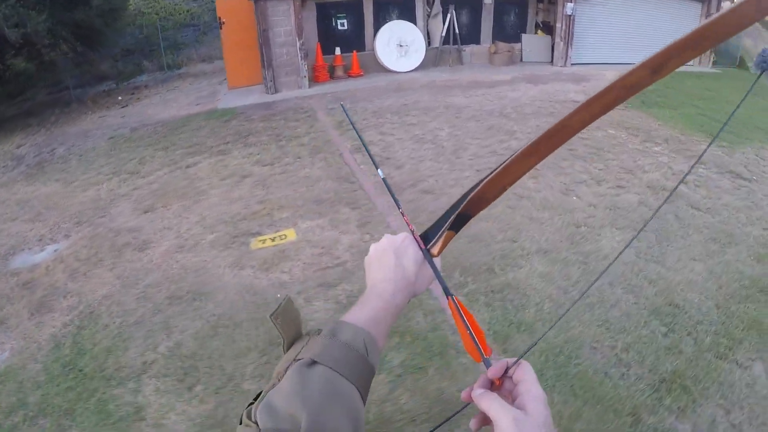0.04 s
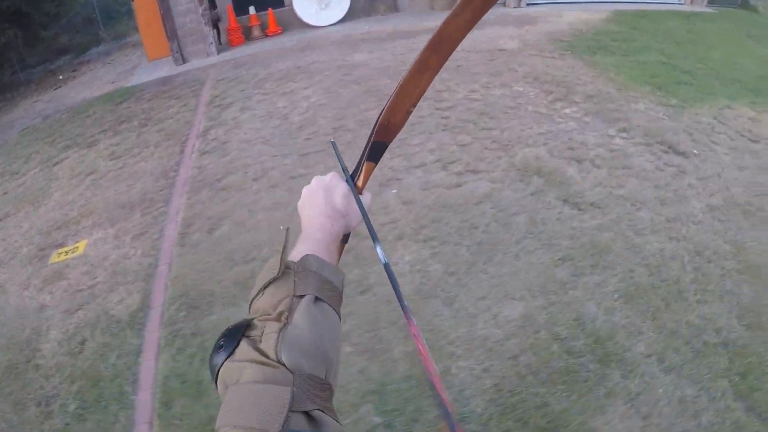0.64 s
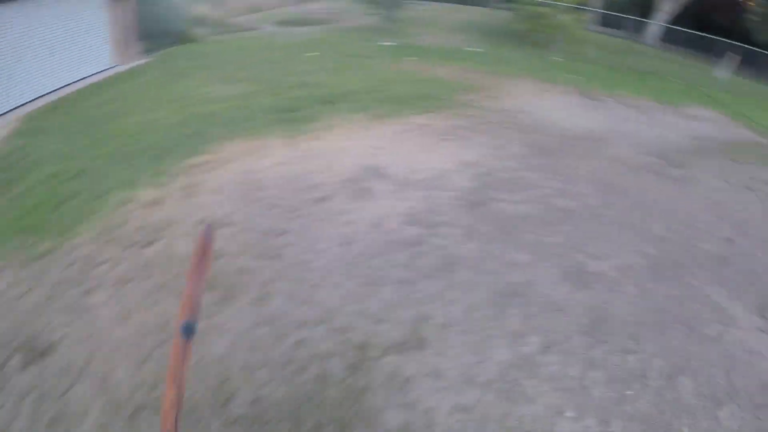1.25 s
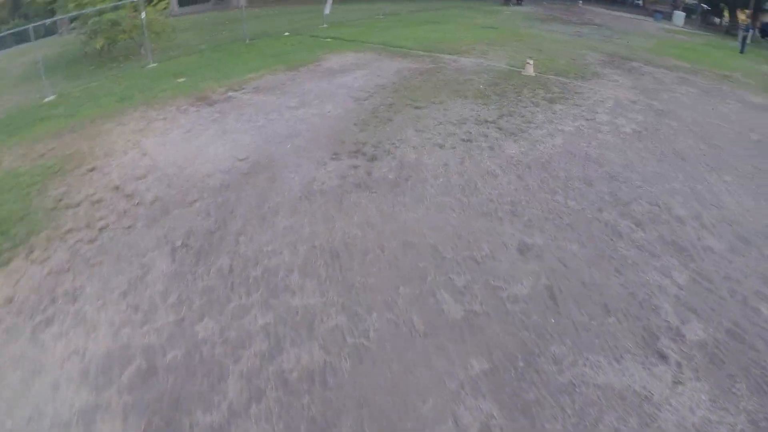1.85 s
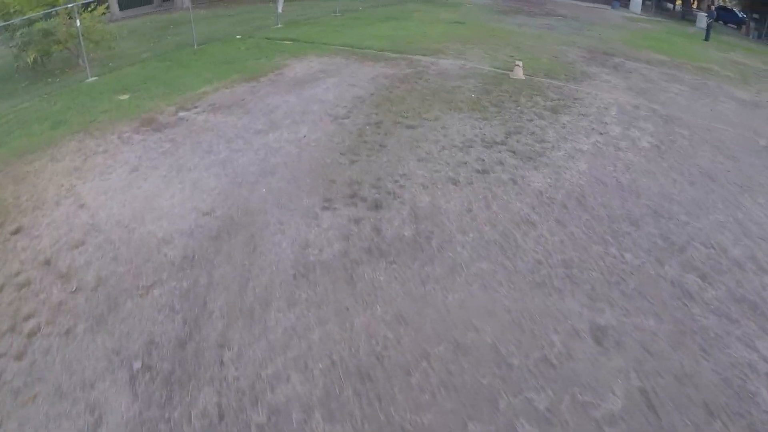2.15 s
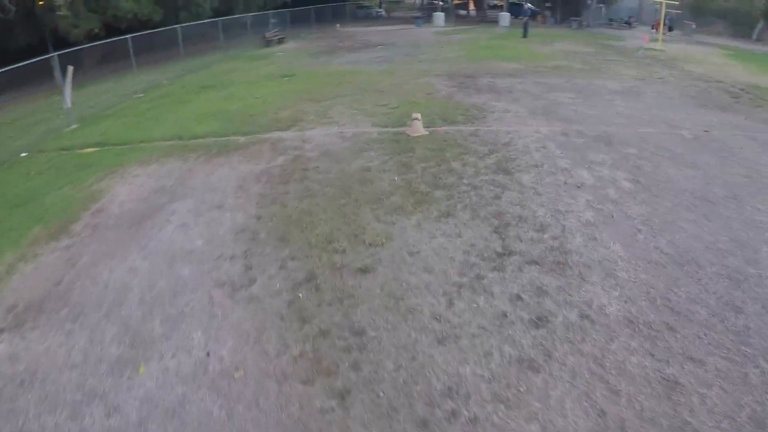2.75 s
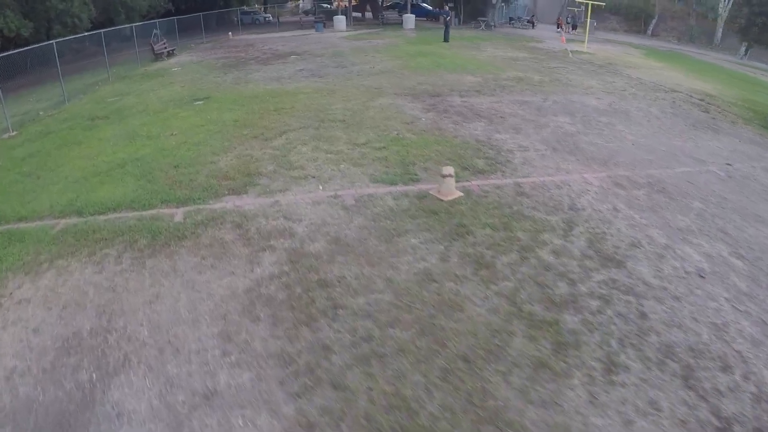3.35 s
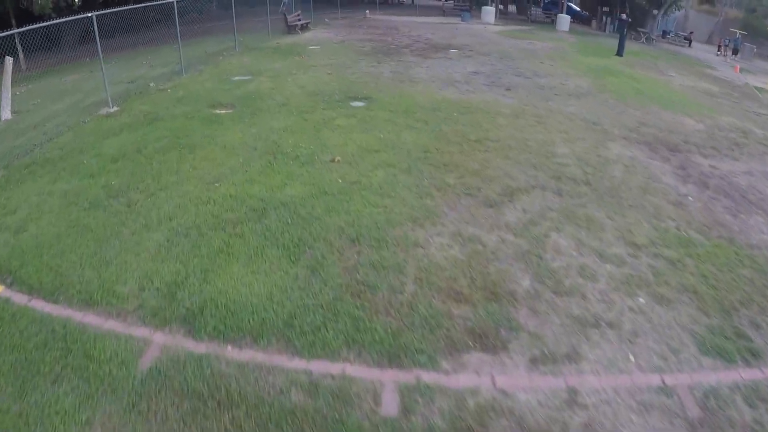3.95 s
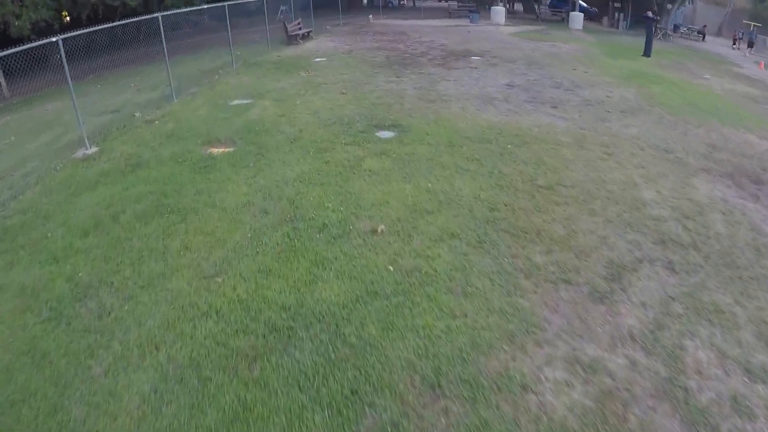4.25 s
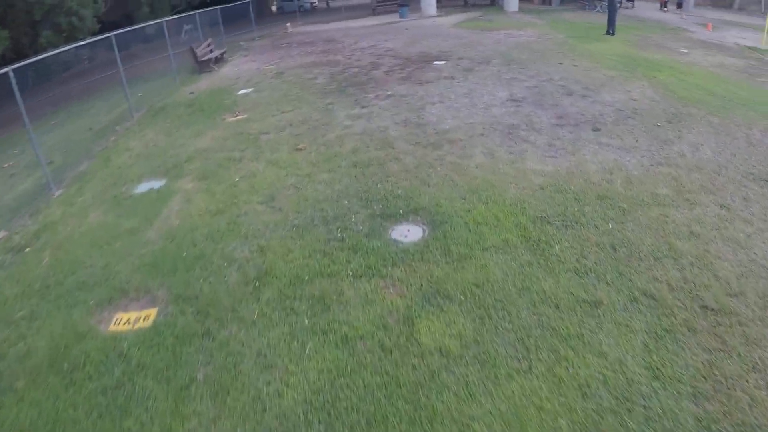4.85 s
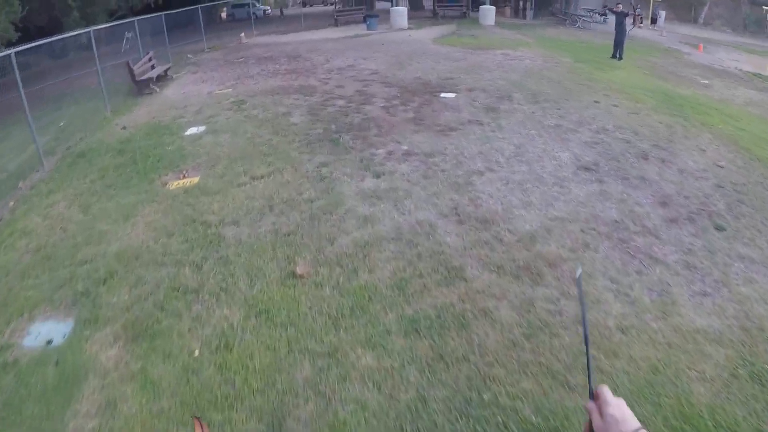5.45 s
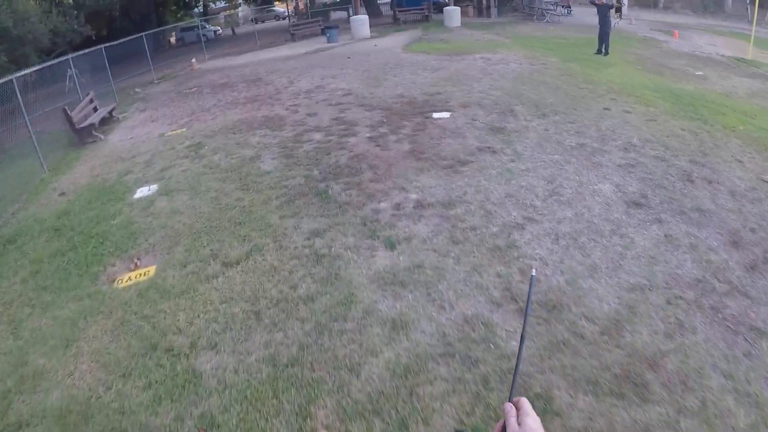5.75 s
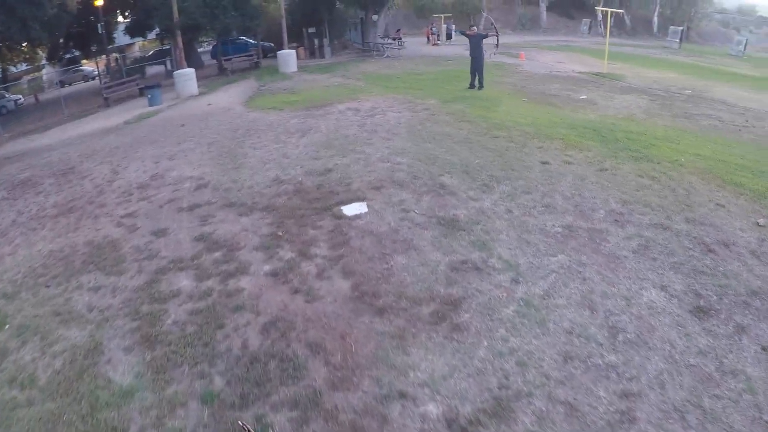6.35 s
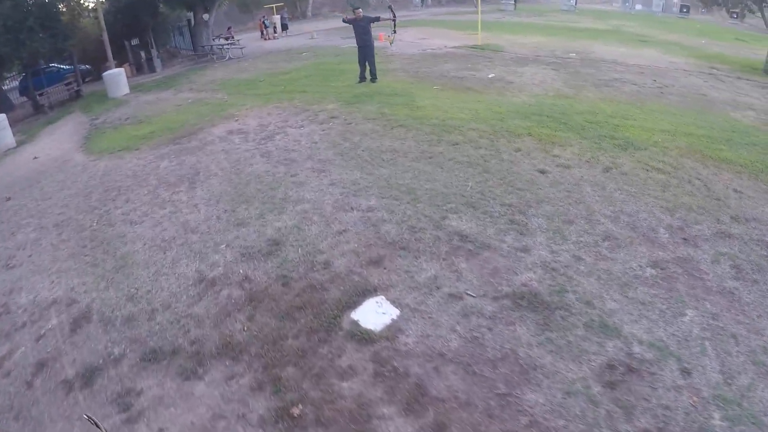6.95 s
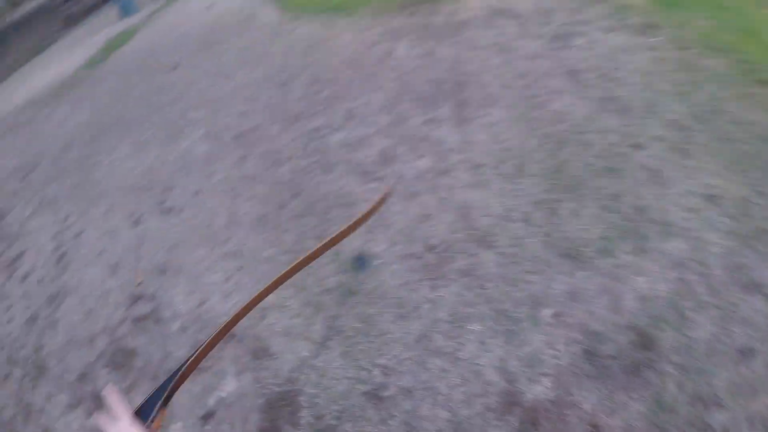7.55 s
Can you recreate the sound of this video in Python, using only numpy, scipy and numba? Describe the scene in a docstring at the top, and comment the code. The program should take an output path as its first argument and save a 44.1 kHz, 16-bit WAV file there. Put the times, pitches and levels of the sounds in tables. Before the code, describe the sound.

Gusty wind rumbles and buffets the microphone, with one sharp bowstring snap early and light arrow clicks and scrapes near the end.

```python
"""Gusts of wind heave, buffet and crackle on the two microphone openings (ports) of a head-worn camera.
The wearer is an archer riding across a grassy park: a tyre crunches, a motor whines, air hisses.
At about 0.7 s the bowstring slips and slaps home, ringing the bow as the arrow zips past it.
Near 6 s the next arrow scrapes, knocks and clicks against the bow.
The wind strikes the left port first; after the first second the sound narrows to mono."""
import sys
import numpy as np
from scipy import signal
from scipy.fft import rfft, irfft, next_fast_len
from scipy.io import wavfile
from scipy.ndimage import uniform_filter1d, map_coordinates
from numba import njit

SR = 44100
rng = np.random.default_rng(int(sys.argv[2]) if len(sys.argv) > 2 else 0)


def output_pcm(signal):
    """Save a mono or channel-first signal as 16-bit PCM at the path in sys.argv[1].

    Samples are clipped to [-1, 1] before scaling.
    """
    pcm = np.clip(np.atleast_2d(signal).T, -1, 1) * 32767
    wavfile.write(sys.argv[1], SR, np.round(pcm).astype(np.int16))


N = 335160
TIME = np.arange(N) / SR


def undb(db):
    """Turn decibels into a gain to multiply by."""
    return 10 ** (np.asarray(db) / 20)


def unit(x):
    """Scale a signal to an average (rms) size of 1."""
    return x / np.sqrt(np.mean(x ** 2))


def curves(table):
    """Join a timed table's points with lines: one curve for each column after the time."""
    times, *columns = np.transpose(table)
    return [np.interp(TIME, times, column) for column in columns]


def colour(x, spectrum):
    """Shape the tone through (pitch_hz, level_db) points; white noise keeps its power."""
    size = next_fast_len(N + 8192, True)
    hz, db = np.transpose(spectrum)
    gain = unit(undb(np.interp(np.log(np.fft.rfftfreq(size, 1 / SR) + 1), np.log(hz), db)))
    # this fold makes the filter ring only after a hit, never before
    cepstrum = irfft(np.log(gain), size)
    cepstrum[1:size // 2] *= 2
    cepstrum[size // 2 + 1:] = 0
    return irfft(rfft(x, size) * np.exp(rfft(cepstrum, size)), size)[..., :N]


def noise():
    """Separate white noise for each port."""
    return rng.standard_normal((2, N))


def wander(rate_hz):
    """A smooth random curve of typical size 1."""
    points = rng.standard_normal(8192)
    return unit(map_coordinates(points, [TIME * rate_hz], order=2, mode="wrap"))


def steady(x, window_s):
    """Even out slow swells so the average of the two ports stays near size 1."""
    return x / np.sqrt(uniform_filter1d(x.mean(axis=0) ** 2, int(window_s * SR)) + 1e-12)


def pan(left_db):
    """Left and right gains that average 1, the left louder by left_db."""
    gains = undb(np.array([left_db, -left_db]) / 2).reshape(2, -1)
    return gains / gains.mean(axis=0)


@njit
def resonance(x, hz, width):
    """Keep the sound near a moving pitch; width is a fraction of that pitch."""
    out, band, low = np.empty(len(x)), 0., 0.
    for i in range(len(x)):
        g = np.tan(np.pi * hz[i] / SR)
        v = (band + g * (x[i] - low)) / (1 + g * (g + width))
        band, low, out[i] = 2 * v - band, low + 2 * g * v, width * v
    return out


def noise_band(hz, width):
    """Noise gathered around a fixed or moving pitch."""
    hz = hz * np.ones(N)
    return resonance(resonance(rng.standard_normal(N), hz, width), hz, width)


def burst(x, shape):
    """Cut a burst out of x, with the outline and energy of shape."""
    piece = x * shape
    return piece * np.sqrt(np.sum(shape ** 2) / np.sum(piece ** 2))


def swell(peak_s, length_s):
    """A bell-shaped rise and fall."""
    return np.exp(-.5 * ((TIME - peak_s) / length_s) ** 2)


# the head wind between gusts: time_s, strength_db
HEAD_WIND = [(0, -36.5), (1.15, -42.5), (1.3, -45.5), (3.0, -44), (3.4, -51), (3.7, -47), (5.0, -45.5),
             (6.25, -56.5), (6.7, -56), (6.95, -44), (7.6, -43.5)]
# gusts: risen_at_s, rise_s, hold_s, fall_s, strength_db, sag_db,
# extra_rumble_db, extra_buffet_db, extra_crackle_db
WIND_GUSTS = [(0.167, 0.17, 0.92, 0.31, -38, 5, 10, 11.5, -2),
              (1.464, 0.64, 0.44, .2, -39.5, 1.5, -5, 3, 7),
              (1.768, 0.063, 0.035, 0.035, -24, -4, -22, 8.5, -8),
              (1.862, 0.064, 0.18, 0.16, -32.5, 0, -5, 11.5, 4),
              (1.978, 0.13, 0.48, 0.044, -19.5, 3.5, -23, -4, -4),
              (2.185, 0.095, 0.05, 0.41, -16.5, 2, -19, -9.5, 5),
              (2.495, 0.18, 0.36, 0.13, -31, -2, 9, 2, 7.5), (2.918, .1, 0.34, 0.27, -44, 2.5, 10.5, 1, 8),
              (3.581, 0.14, 0.61, 0.51, -21, 0, 2.5, 0, 5.5),
              (4.305, 0.32, 0.21, 0.2, -26.5, -1, 6, 1.5, -15),
              (4.569, 0.063, 0.085, 0.39, -23, 1, -18, 3, -2),
              (4.846, 0.17, 0.04, 0.2, -38.5, 13.5, 20, 16, -8),
              (5.24, 0.22, 0.41, 0.17, -27.5, 4.5, 11, -0.5, 4),
              (5.791, 0.19, 0.2, 0.31, -33.5, 5, 4, 3, -3),
              (7.515, 0.051, 0.058, 0.075, -22, -3.5, 1, 7, 4)]


def wind(edge_db=30):
    """Each gust climbs by edge_db, holds while it drifts, then drops back into the head wind."""
    strength_db, = curves(HEAD_WIND)
    for risen_at_s, rise_s, hold_s, fall_s, db, sag_db, *extra_db in WIND_GUSTS:
        age = TIME - risen_at_s
        edge = np.maximum(-age / rise_s, 0) + np.maximum((age - hold_s) / fall_s, 0)
        gust_db = db - sag_db * np.clip(age / hold_s, 0, 1) - edge_db * edge
        strength_db = np.maximum(strength_db, gust_db + np.array([0, *extra_db])[:, None])
    flutter_db, rumble_db, buffet_db, crackle_db = strength_db + wander(18)
    return heave() + rumble(rumble_db) + buffet(buffet_db) + flutter(flutter_db) + crackle(crackle_db)


def follow(strength_db, bend_db, level_db, below, above):
    """A gain that is level_db at the bend, with one slope below it and another above."""
    over_db = strength_db - bend_db
    return undb(level_db + below * np.minimum(over_db, 0) + above * np.maximum(over_db, 0))


def wind_side_db(left_db=24.5, until_s=1.1, fade_s=0.16):
    """How much harder the wind strikes the left port at first."""
    return left_db * np.clip(1 - (TIME - until_s) / fade_s, 0, 1)


# tone of the largest swirls of air: pitch_hz, level_db
HEAVE_TONE = [(8, -5.5), (20, -5), (38, 0), (55, -4), (75, -10.5), (130, -25.5), (400, -89), (2000, -130)]
# their loudness: time_s, level_db
HEAVE_LOUDNESS = [(0, -25), (.75, -24.5), (1.18, -31.5), (1.7, -21.5), (2.1, -23.5), (2.9, -26),
                  (3.2, -32.5), (3.5, -25), (4.1, -22), (4.65, -24.5), (5.1, -30), (5.6, -26.5),
                  (6.05, -29.5), (6.4, -27.5), (6.9, -24), (7.6, -24.5)]


def heave():
    """The largest swirls push slowly on the ports in the deep bass."""
    return steady(colour(noise(), HEAVE_TONE), 0.13) * undb(curves(HEAVE_LOUDNESS)[0])


# tone of the rumbling swirls: pitch_hz, level_db
RUMBLE_TONE = [(30, -17.5), (55, -9), (72, 0), (105, -1.5), (135, -7.5), (200, -37.5), (600, -89),
               (2000, -130)]


def rumble(strength_db):
    """Large swirls rumble louder as the wind grows."""
    low = steady(colour(noise() * pan(wind_side_db() / 2), RUMBLE_TONE), 0.32)
    gain = follow(strength_db, bend_db=-35, level_db=-26, below=0.5, above=0.2752)
    return low * undb(0.79 * wander(4.1)) * gain


# tone of the thumping swirls: pitch_hz, level_db
BUFFET_TONE = [(70, -14), (115, -6.5), (150, -1), (210, -2), (290, -6), (420, -12.5), (700, -32),
               (1500, -39), (4000, -103)]


def buffet(strength_db, shed_hz=150, drift_octaves=0.48):
    """Swirls thump the ports; others peel off the camera as round lumps of wandering pitch."""
    side = pan(wind_side_db())
    thumps = colour(noise() * undb(3.56 * wander(70)), BUFFET_TONE)
    thumps = steady(thumps * side, 0.13) * undb(-0.1 * wander(25))
    hz = shed_hz * 2 ** (drift_octaves * wander(9))
    lumps = np.array([noise_band(hz, width=0.48) for port in range(2)]) / np.sqrt(hz)
    lumps = steady(lumps * side, 0.15)
    return (thumps + lumps) * follow(strength_db, bend_db=-35, level_db=-29, below=0.93, above=0.5348)


# tone of the small swirls: pitch_hz, level_db
FLUTTER_TONE = [(130, -34), (300, 1.5), (480, 3), (700, -1), (1000, -6.5), (1500, -17), (2200, -26.5),
                (3200, -45), (5000, -65.5), (9000, -100.5)]


def flutter(strength_db, flicker_db=4):
    """Small swirls arrive in quick bunches."""
    bunches = 0.13 * wander(85) + 0.77 * wander(420)
    swirls = colour(noise() * undb(flicker_db * bunches), FLUTTER_TONE)
    return steady(swirls, 0.081) * undb(strength_db - 1)


# tone of the crackle: pitch_hz, level_db
CRACKLE_TONE = [(300, -16), (900, 10), (1600, 9), (2400, 0.5), (3400, -10.5), (4400, -21), (5500, -38.5),
                (7500, -54), (11000, -82)]


def crackle(strength_db, spikes_per_s=520):
    """Strong gusts rasp with ragged bunches of pressure spikes."""
    hits = rng.random(N) < spikes_per_s / SR * undb(5 * np.minimum(wander(90), 1))
    size_db = 5.2 * np.minimum(rng.exponential(size=N), 2.2)
    spikes = hits * undb(size_db) * rng.choice([-1, 1], N)
    gain = follow(strength_db, bend_db=-15, level_db=-33, below=1.0, above=0.5)
    return unit(colour(spikes, CRACKLE_TONE)) * gain


# rise and fall of the riding noise: time_s, level_db
RIDE_LOUDNESS = [(0, -60.5), (.85, -64.5), (1.05, -73.5), (1.35, -67), (1.85, -62.5), (2.4, -66),
                 (4.4, -62), (6.7, -65.5), (6.9, -57.5), (7.6, -57)]


def ride():
    """Tyre, motor and port hiss swell and fade together; the tyre changes less."""
    ride_db, = curves(RIDE_LOUDNESS)
    tyre_db = -46.5 + 0.59 * (ride_db - ride_db.mean())
    return tyre() * undb(tyre_db) + motor() * undb(ride_db - 1.5) + air_hiss(port_db=ride_db - 5)


# tone of the tyre: pitch_hz, level_db
TYRE_TONE = [(80, -20), (250, 0.5), (450, 1), (800, 0), (1500, -1), (2500, -9.5), (3100, -14),
             (4000, -14.5), (5000, -28), (7000, -47.5), (12000, -72)]


def tyre(crunch_db=1.5):
    """The tyre crunches softly over dry grass."""
    grains = rng.standard_normal(N) * undb(crunch_db * wander(500) + wander(39))
    return unit(colour(grains, TYRE_TONE))


# the wheel motor's base note: time_s, pitch_hz
MOTOR_PITCH = [(0, 121.5), (4.4, 121.4), (5.5, 120.7), (6.3, 119.8), (7.0, 119.3), (7.6, 119.2)]
# the overtones its housing lets out: pitch_hz, level_db
MOTOR_TONE = [(4600, 0.5), (5050, -5), (5220, 4.5), (5580, 1.5), (5750, 0), (6100, 2), (6400, -1.5),
              (6780, -2), (6950, -21), (7150, -23.5), (7500, -20.5), (8250, -11), (8800, -33)]


def motor(waver_hz=9):
    """A thin whine of high overtones, each wavering as the load changes."""
    hum_hz, = curves(MOTOR_PITCH)
    hum_phase = 2 * np.pi * np.cumsum(hum_hz) / SR
    hz, db = np.transpose(MOTOR_TONE)
    out = np.zeros(N)
    for harmonic in range(38, 73):
        points = rng.standard_normal((2, 512))
        along, across = (np.interp(TIME * waver_hz, np.arange(512), row) for row in points)
        phase = harmonic * hum_phase + 2 * np.pi * rng.random()
        gain = undb(np.interp(harmonic * hum_hz[0], hz, db))
        out += gain * ((1 + along) * np.sin(phase) + across * np.cos(phase))
    return unit(out)


# tone of the hiss at the ports: pitch_hz, level_db
PORT_TONE = [(3000, -12), (4900, -6), (5300, 10), (5900, 5.5), (6650, -1), (7150, -19), (9500, -24),
             (12000, -53)]
# tone of the higher, airy hiss: pitch_hz, level_db
AIR_TONE = [(3000, -8.5), (6000, -3), (8000, -3.5), (10000, -4.5), (11200, -12), (13000, -17.5),
            (15000, -37)]
# loudness of that airy hiss: time_s, level_db
AIR_LOUDNESS = [(0, -58.5), (.75, -66.5), (1.05, -69), (1.8, -62), (2.25, -77), (6.6, -79.5), (6.95, -59),
                (7.6, -61.5)]


def air_hiss(port_db):
    """Air hisses past the camera."""
    port = colour(rng.standard_normal(N), PORT_TONE) * undb(port_db)
    airy = colour(rng.standard_normal(N), AIR_TONE) * undb(curves(AIR_LOUDNESS)[0])
    return port + airy


def whistle(pitch_hz=6400, level_db=-53, until_s=0.81, fade_db_per_s=37.5):
    """Air blows a breathy whistle across each port, then dies away."""
    breath = np.array([noise_band(pitch_hz, width=0.22) for port in range(2)])
    return unit(breath) * undb(level_db - fade_db_per_s * np.maximum(TIME - until_s, 0))


# loudness of the rustle: time_s, level_db
RUSTLE_LOUDNESS = [(0, -66), (1.2, -67), (2.6, -59.5), (3.3, -52.5), (4.3, -64.5), (4.7, -66), (4.95, -55),
                   (5.8, -58.5), (6.5, -63), (7.6, -57)]


def rustle(pitch_hz=2420):
    """A soft, thin rustle shows in the lulls between gusts."""
    return unit(noise_band(pitch_hz, width=0.2)) * undb(curves(RUSTLE_LOUDNESS)[0])


def puffs(table):
    """Short, dull swells of air pressure."""
    out = np.zeros(N)
    for peak_s, db, length_s, top_hz in table:
        band = signal.butter(4, [70, top_hz], "band", fs=SR, output="sos")
        air = signal.sosfilt(band, rng.standard_normal(N))
        out += undb(db) * burst(air, swell(peak_s, length_s))
    return out


# the strongest single swirls: peak_s, level_db, length_s, top_hz
WIND_PUFFS = [(.345, -23.5, 0.0025, 640), (.874, -18.5, 0.0081, 466), (1.014, -19, 0.00097, 1010),
              (1.7605, -21.5, 0.0011, 1180), (1.784, -22, 0.0018, 1000), (1.799, -16, 0.0042, 1200),
              (1.964, -26, 0.0016, 1070), (2.012, -20, 0.0026, 1300), (2.18, -21.5, 0.0064, 1460),
              (2.281, -16, 0.0035, 1420), (2.304, -18, 0.0021, 1200), (2.613, -15.5, 0.0052, 516),
              (3.594, -18, 0.0013, 1300), (3.618, -21, .004, 1390), (4.311, -7, 0.0016, 356),
              (4.582, -12, 0.0016, 450), (4.68, -24, 0.017, 880), (4.834, -25, 0.002, 440),
              (5.338, -18.5, 0.0022, 1350), (7.511, -22, 0.0013, 700), (7.541, -17.5, 0.0021, 990),
              (7.567, -14.5, 0.0034, 1060)]


def wind_puffs():
    """Lone swirls burst on the ports."""
    return pan(wind_side_db() / 2) * puffs(WIND_PUFFS)


def taps(table, wood_top_hz=7000):
    """The first touch of each blow: one sharp kick, rounded by the give of the wood."""
    out = np.zeros(N)
    for start_s, db, decay_s, *_ in table:
        out[int(start_s * SR)] += undb(db) * np.sqrt(decay_s * SR / 2)
    return signal.sosfilt(signal.butter(4, wood_top_hz, fs=SR, output="sos"), out)


def rubs(table, grain_db, rise_share):
    """Grainy bursts of rubbing that rise in a share of their decay time; top_hz sets the brightness."""
    out = np.zeros((2, N))
    force = unit(rng.standard_normal(N) * undb(grain_db * wander(900)))
    for peak_s, db, decay_s, top_hz, *_ in table:
        near = slice(int((peak_s - .03) * SR), int((peak_s + .15) * SR))
        age = TIME[near] - peak_s
        shape = np.exp(np.minimum(age / rise_share, -age) / decay_s)
        treble_cut = signal.butter(2, top_hz, fs=SR)
        out[:, near] += undb(db) * signal.lfilter(*treble_cut, burst(force[near], shape))
    return out


def ring(force, notes):
    """A force rings an object's own notes; each fades by 60 dB in its ring_s."""
    t = TIME[:SR // 4]
    tone = sum(undb(db) * np.sin(2 * np.pi * hz * t) * 1000 ** (-t / ring_s) for hz, db, ring_s in notes)
    return signal.fftconvolve(force, tone[None] / np.sqrt(np.sum(tone ** 2)), axes=1)[:, :N]


# arrow clicks: start_s, level_db, decay_s, top_hz, pitch_factor
ARROW_CLICKS = [(.496, -38, 0.00054, 7000, 1.3), (6.4621, -24.5, 0.0018, 10000, 1.02),
                (6.5203, -31, 0.0021, 11000, 0.98)]
# tone of a click: pitch_hz, level_db
CLICK_TONE = [(600, -23), (1500, 2), (3000, 2.5), (4500, 7), (5400, -10), (6100, 7.5), (7100, -11),
              (8200, -10), (9800, -22), (10800, -32), (13000, -45)]
# the shaft's own notes, before the pitch factor: pitch_hz, level_db, ring_s
SHAFT_NOTES = [(1670, -5, .02), (2090, -3, .02), (2810, 0, 0.045), (3470, -2, 0.035), (4330, -4, 0.026),
               (4300, -1, .018), (4740, -3, 0.037), (5100, -3, .018), (5900, -2, .018), (8250, -14, .03)]


def arrow_clicks(ring_db=-1):
    """An arrow clicks on bow and string; the grip sets the pitch its shaft rings at."""
    force = undb(-2) * taps(ARROW_CLICKS) + undb(-3) * rubs(ARROW_CLICKS, grain_db=1, rise_share=.3)
    out = colour(force, CLICK_TONE)
    for click in ARROW_CLICKS:
        notes = [(hz * click[-1], db, ring_s) for hz, db, ring_s in SHAFT_NOTES]
        out += undb(ring_db) * ring(taps([click])[None], notes)
    return out


# the cracks of the shot: start_s, level_db, decay_s, top_hz
BOW_CRACKS = [(.674, -30.5, 0.01, 9000), (.686, -27, 0.0048, 6000), (.6892, -16, .0016, 13000),
              (.6912, -15.5, 0.00086, 13000), (.699, -17.5, 0.0022, 3400), (.7035, -13, 0.0015, 8040),
              (.7085, -16.5, 0.0027, 4520), (.717, -28, 0.0056, 2600), (.728, -30, 0.0044, 1500),
              (.733, -45, .03, 6000), (.772, -43, 0.0086, 6000), (.875, -30.5, 0.0036, 7000)]
# tone of a crack: pitch_hz, level_db
CRACK_TONE = [(150, -5), (500, 6), (1300, -3), (2000, 1.5), (2900, 2.5), (4000, -3), (5800, 2.5),
              (7400, 0.5), (8300, -14), (9800, -7), (10800, -29), (13000, -12), (15500, -62)]
# notes of bow and shaft, muffled by the hand: pitch_hz, level_db, ring_s
BOW_NOTES = [(1260, -3, 0.037), (1946, -6, 0.05), (2180, -1, 0.034), (2540, -4, .05), (2930, 3, 0.016),
             (3430, -12, 0.04), (3700, 4, 0.029), (4200, -4, 0.025), (5800, -9, 0.032)]
# two thumps of air as the bow kicks back: peak_s, level_db, length_s, top_hz
BOW_THUMPS = [(0.698, -13, 0.0084, 393), (0.721, -16.5, 0.008, 216)]


def bow_shot(ring_db=-8.5, tap_db=-7, spread_db=-11):
    """The string slips, the arrow scrapes by and the string slaps home, ringing the bow."""
    force = rubs(BOW_CRACKS, grain_db=1.5, rise_share=.25)
    # each port hears the cracks a little differently
    spread = rubs(BOW_CRACKS, grain_db=1.5, rise_share=.25) * np.array([[1], [-1]])
    snap = colour(force + undb(spread_db) * spread, CRACK_TONE)
    ringing = ring(undb(ring_db) * force + undb(tap_db) * taps(BOW_CRACKS), BOW_NOTES)
    return snap + ringing + pan(left_db=-9) * puffs(BOW_THUMPS)


# the squeak of the leaving arrow: time_s, pitch_hz, level_db
ARROW_ZIP = [(.678, 1900, -60), (.683, 2400, -29), (.687, 2950, -22), (.692, 3100, -60)]


def arrow_zip(rough_db=2):
    """The shaft rubs along the bow, squeaking higher as it gathers speed."""
    hz, db = curves(ARROW_ZIP)
    sliding = (TIME > ARROW_ZIP[0][0]) & (TIME < ARROW_ZIP[-1][0])
    squeak = np.sqrt(2) * np.sin(2 * np.pi * np.cumsum(hz) / SR)
    return sliding * squeak * undb(db + rough_db * wander(900))


# scrapes while handling the next arrow: peak_s, level_db, decay_s, top_hz, pitch_hz
ARROW_SCRAPES = [(1.325, -46.5, .008, 4950, 2450), (1.386, -41, 0.0057, 4970, 2580),
                 (5.9607, -26.5, 0.004, 4200, 2320), (5.975, -31, 0.0039, 3500, 2800),
                 (5.9808, -37, .0025, 4500, 3800), (5.988, -30.5, 0.012, 4050, 3580),
                 (6.041, -38, 0.0044, 3200, 2400), (6.0605, -34, 0.0045, 3000, 2100),
                 (6.0788, -30.5, 0.007, 3150, 2590), (6.2475, -41, .002, 3000, 2600),
                 (6.2635, -29.5, 0.0027, 2600, 1900), (6.2815, -31.5, 0.017, 3350, 2430),
                 (6.452, -41, 0.0044, 5000, 4300), (6.514, -39, .005, 6000, 4900),
                 (6.8398, -28.5, 0.006, 8500, 4500), (6.8545, -29, 0.012, 14000, 3820),
                 (7.036, -42.5, 0.024, 6000, 3300)]
# tone of a scrape: pitch_hz, level_db
SCRAPE_TONE = [(250, -26), (550, -14), (1000, -5), (1700, -3), (2400, 0), (3100, -6.5), (3700, -5),
               (4700, -12.5), (5800, -10), (7100, -21.5), (8500, -15.5), (10000, -26), (13500, -45)]


def arrow_scrapes(ring_db=2.5):
    """Shaft, hand and sleeve rub dryly, with a pitch that shifts with the grip."""
    force = rubs(ARROW_SCRAPES, grain_db=4, rise_share=.2)
    ringing = resonance(force[0], curves(ARROW_SCRAPES)[-1], 0.25)
    return colour(force, SCRAPE_TONE) + undb(ring_db) * ringing


# the sharpest bursts of crackle: peak_s, level_db, length_s
WIND_SPITS = [(2.064, -33, .001), (2.183, -32.5, .0028), (2.246, -31, 0.0018), (2.2545, -25, .0006),
              (2.273, -32, 0.00091), (2.281, -33, 0.0019), (2.367, -26, 0.00094), (2.372, -29, 0.0008),
              (2.431, -34, .002), (2.438, -35, 0.0011), (2.529, -36, 0.0017), (2.718, -32, .0015),
              (2.743, -29.5, 0.0014), (3.548, -29, 0.001), (3.594, -31.5, 0.0013), (3.613, -33, 0.0014),
              (3.66, -26.5, .0015), (3.703, -29, .0012), (3.713, -22, 0.00084), (3.751, -28.5, .0015),
              (3.785, -32.5, 0.0017), (3.831, -29, .0022), (3.846, -29, 0.0013), (3.908, -30.5, 0.0025),
              (4.04, -30, 0.0038), (4.105, -30, 0.0023), (4.14, -30, 0.0017), (4.166, -32, .002),
              (4.563, -33, .0015), (4.608, -33.5, 0.0047)]
# their tone: pitch_hz, level_db
SPIT_TONE = [(300, -14), (900, 4.5), (1600, 5.5), (2400, 1.5), (3400, -5), (4400, -14), (5500, -32),
             (7500, -52), (11000, -82)]


def wind_spits():
    """Hard gusts tear at the ports in short, sharp spits."""
    rasp = colour(rng.standard_normal(N), SPIT_TONE)
    return sum(undb(db) * burst(rasp, swell(peak_s, length_s)) for peak_s, db, length_s in WIND_SPITS)


# the rushing sound: time_s, pitch_hz, level_db
RUSH_PATH = [(0, 2340, -89), (3.0, 2190, -57), (5.0, 2390, -55.5), (6.12, 1870, -51.5), (6.62, 1094, -41.5),
             (7.15, 756, -40), (7.6, 597, -39.5)]


def rush():
    """A broad rush grows out of silence and sinks in pitch near the end."""
    hz, db = curves(RUSH_PATH)
    return unit(noise_band(hz, width=0.88) / np.sqrt(hz)) * undb(db + wander(16))


# dead wooden knocks: start_s, level_db, pitch_hz, decay_s
ARROW_KNOCKS = [(5.9603, -19, 2220, .0006), (5.9803, -25, 3680, 0.0008), (6.0602, -30, 2100, 0.00077),
                (6.2642, -22, 1700, 0.0012), (6.8391, -11.5, 1350, 0.00065), (6.8532, -28, 3100, .0013)]


def arrow_knocks(wood_top_hz=7000):
    """The arrow meets the gripped bow; each knock rings one note that dies at once."""
    out = np.zeros(N)
    for start_s, db, hz, decay_s in ARROW_KNOCKS:
        age = np.maximum(TIME - start_s, 0)
        out += undb(db) * np.sin(2 * np.pi * hz * age) * np.exp(-age / decay_s)
    return signal.sosfilt(signal.butter(2, wood_top_hz, fs=SR, output="sos"), out)


def scene():
    """Everything that reaches the two ports."""
    gusts = wind() + wind_puffs() + wind_spits()
    background = ride() + whistle() + rustle() + rush()
    archery = arrow_clicks() + bow_shot() + arrow_zip() + arrow_scrapes() + arrow_knocks()
    return gusts + background + archery


def record(dry, wide_db=4, narrow_from_s=1.084, narrow_db_per_s=31, top_hz=14800):
    """Wide stereo narrows to mono; peaks clip and the highest treble is cut."""
    width_db = wide_db - narrow_db_per_s * np.maximum(TIME - narrow_from_s, 0)
    mid = dry.mean(axis=0)
    side = (dry[0] - dry[1]) / 2 * undb(width_db)
    clipped = np.clip([mid + side, mid - side], -1, 1)
    return signal.sosfilt(signal.ellip(8, .2, 70, top_hz, fs=SR, output="sos"), clipped)


dry = scene()
out = record(dry)
output_pcm(out)
```